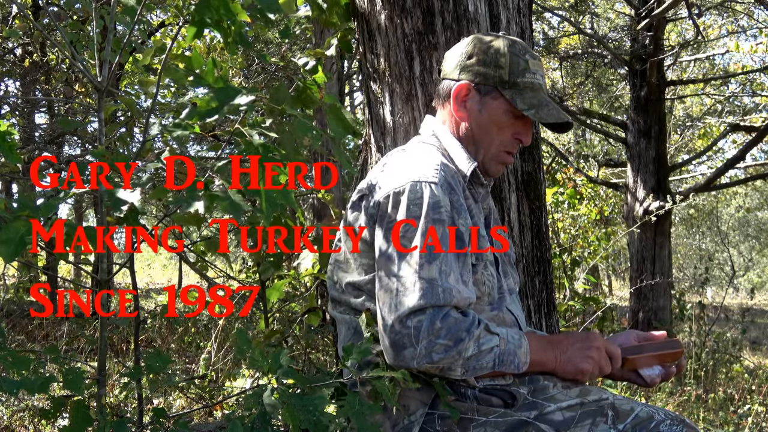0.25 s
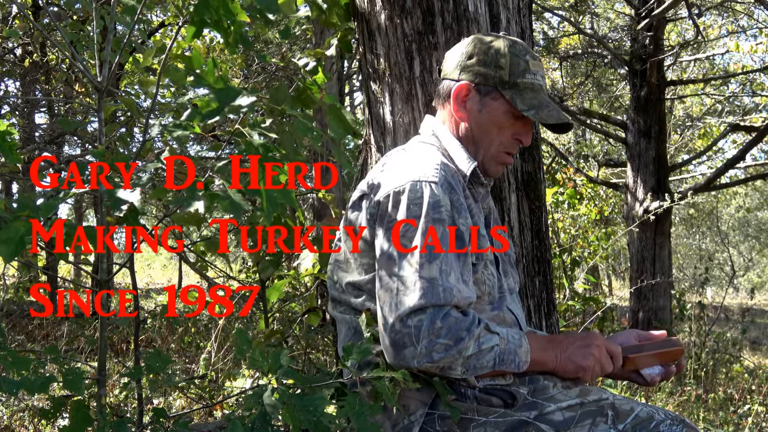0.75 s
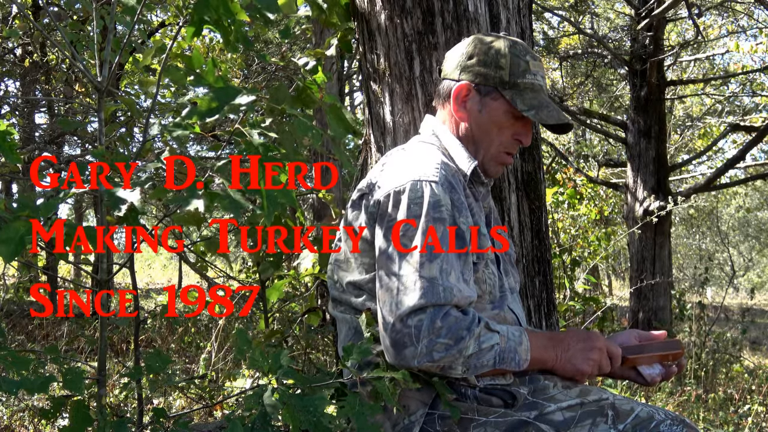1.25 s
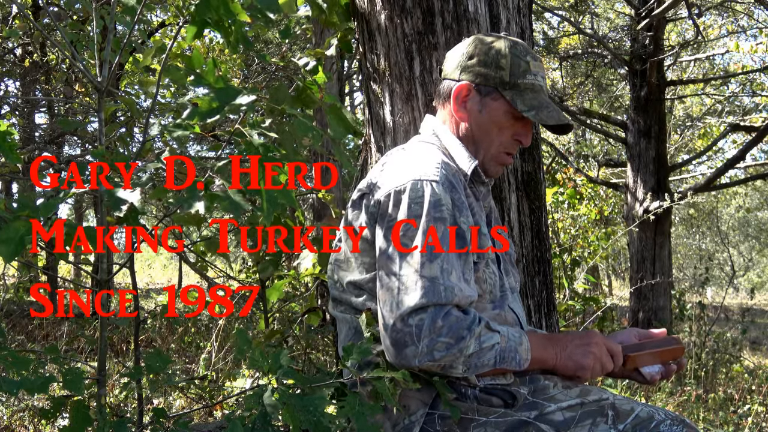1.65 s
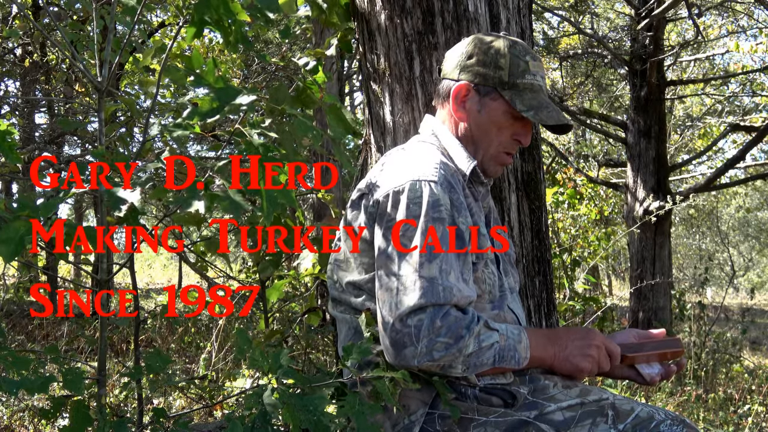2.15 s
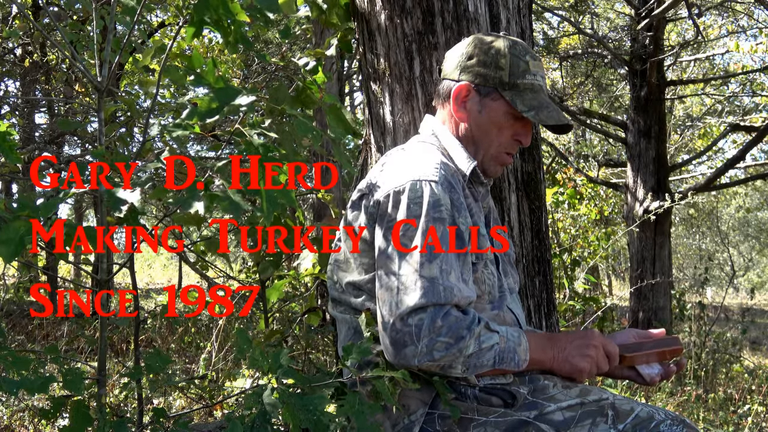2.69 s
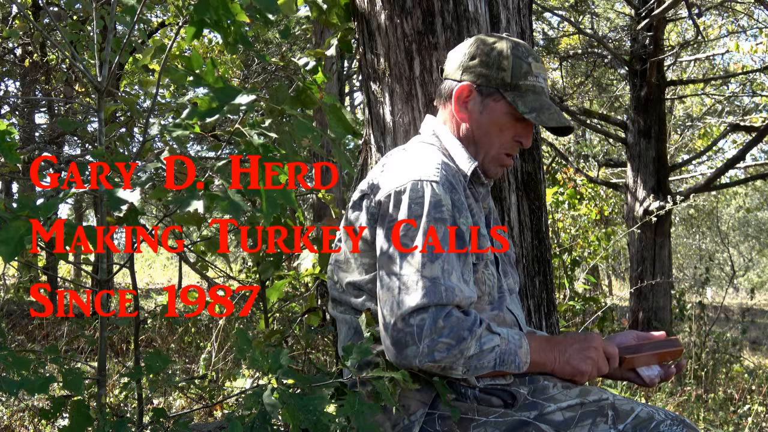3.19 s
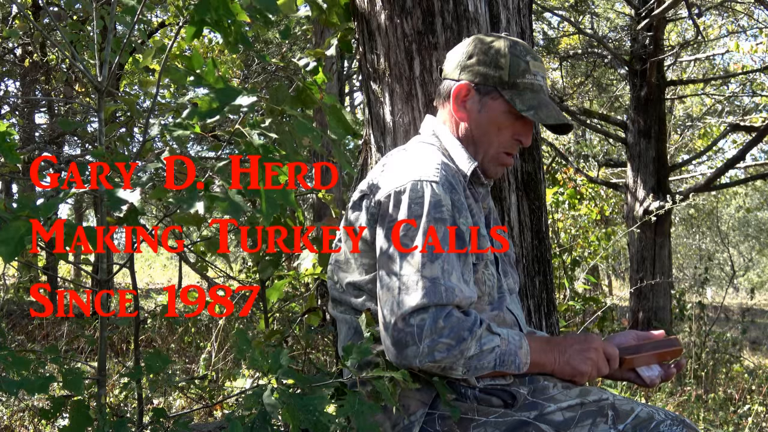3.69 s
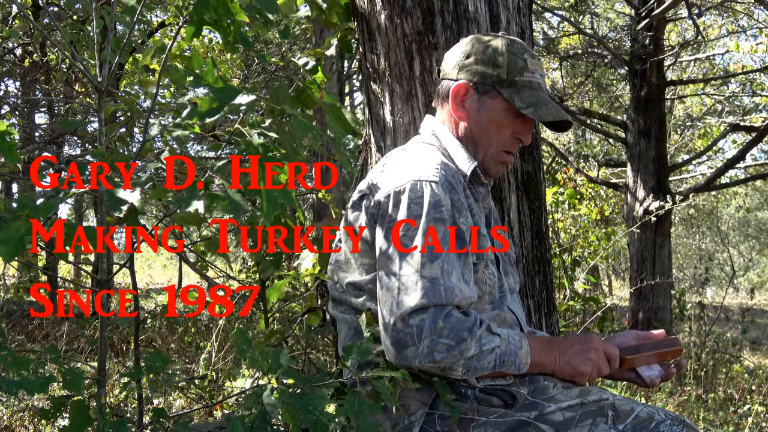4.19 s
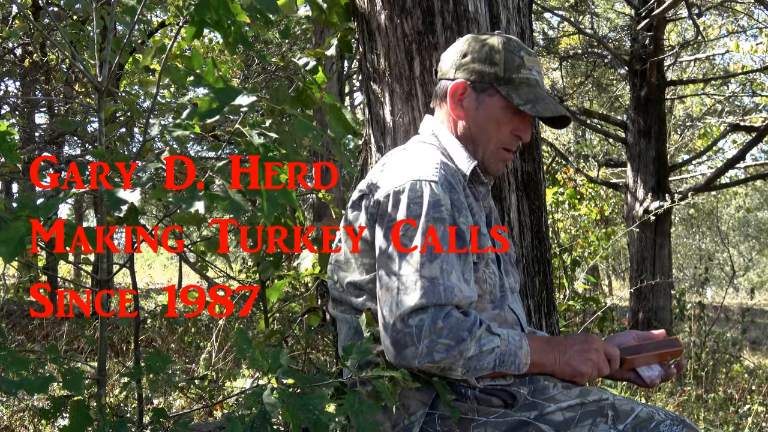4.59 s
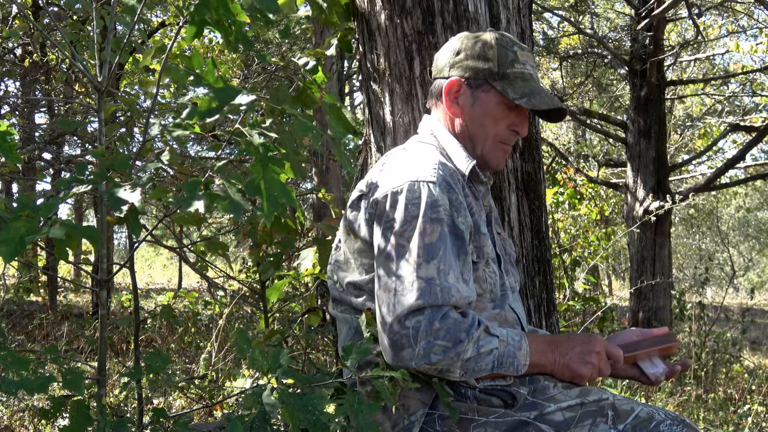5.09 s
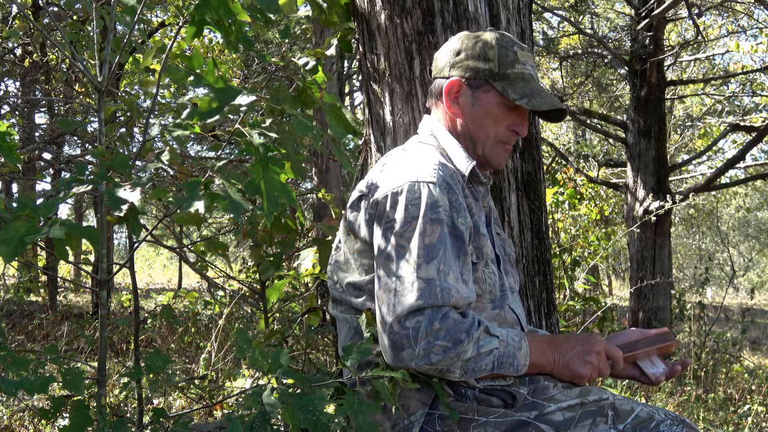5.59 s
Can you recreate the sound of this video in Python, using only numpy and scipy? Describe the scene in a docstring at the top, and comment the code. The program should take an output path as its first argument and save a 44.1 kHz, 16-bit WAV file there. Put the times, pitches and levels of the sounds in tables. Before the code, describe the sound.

Seven squeaky, rasping hen-turkey yelps scraped on a wooden box, a lone cluck, then hushed woodland with crickets and a faint far bird.

```python
"""A katydid's even run of ticks opens the scene over chirping crickets, faint rustle and insect chorus.
Then a wooden box call gives seven turkey yelps and one sharp cluck: its chalked lid sticks and slips on the
rim, squeaks thinly, locks onto the side wall's resonance and breaks into a rasp as a lower vibration joins in.
Ground and trees return echoes as delayed copies and a noise tail. Later the katydid buzzes as modulated noise,
and a far bird cries in wavering harmonics, with two soft pips and two dull thuds of shaped tone and noise."""
import sys
import numpy as np
from scipy import signal
from scipy.fft import rfft, irfft, next_fast_len
from scipy.io import wavfile
from scipy.ndimage import uniform_filter1d, minimum_filter1d, map_coordinates

SR = 44100
rng = np.random.default_rng(int(sys.argv[2]) if len(sys.argv) > 2 else 0)


def unload_audio(sound):
    """Save the sound as a 16-bit wav file, at the path given as the first command line argument."""
    columns = np.transpose(np.atleast_2d(sound))
    # keep every value between -1 and 1, then stretch to whole-number steps
    steps = np.round(np.clip(columns, -1, 1) * 32767)
    wavfile.write(sys.argv[1], SR, steps.astype(np.int16))


N = 257981
TIME = np.arange(N) / SR  # seconds

# Strokes of the lid. Each row: start, lock, break and end in seconds, free pitch in Hz, locked pitch in Hz,
# relative level in dB, roughness of the rasp from 0 to 1.
STROKES = [ (0.65, .662, .709, .730, 813, 799.3, -4, .5),
           (0.978, 0.996, 1.046, 1.08, 963.6, 832.8, 0.5, .7),
           (1.308, 1.332, 1.380, 1.41, 947, 840.5, 0.5, .7),
           (1.594, 1.629, 1.660, 1.696, 1017, 855.5, 0.5, .98),
           (1.875, 1.916, 1.946, 1.987, 997, 843.3, 0, .9),
           (2.172, 2.216, 2.240, 2.284, 1028, 846.5, 0, .98),
           (2.474, 2.502, 2.537, 2.5725, 1011, 846.8, 0.5, .98)]
# The lid catches on the rim. Each row: time in seconds, relative level in dB.
CATCHES = [(.968, -36), (1.309, -12.5), (1.593, -15.5), (2.166, -30.5), (2.470, -18)]
# Broad response of the hollow box. Each row: frequency in Hz, gain in dB.
BOX_RESPONSE = [(100, -41), (550, -47), (800, -32), (1050, -8), (1600, -7), (2150, -23), (3450, -30.5),
                (4400, -31.5), (6500, -28), (9500, -36.5), (13000, -39.5), (15500, -53)]
# Resonances of its thin walls. Each row: centre in Hz, width at half the lift in Hz, lift in dB.
WALL_RESONANCES = [(1660, 280, 6.5), (2530, 180, 5.5), (2837, 340, 11), (3137, 180, 10), (3980, 270, 16.5),
                   (5050, 230, 3.5), (5630, 350, 7), (8030, 380, 12), (10926, 300, 13)]
# Dull rub of lid on rim. Each row: frequency in Hz, relative level in dB.
RUB_COLOUR = [(40, -8.5), (160, -4), (450, -8), (900, -15.5), (2000, -41)]
# Dry scrape and rattle of the cluck. Each row: frequency in Hz, relative level in dB.
CHATTER_COLOUR = [(450, -37), (750, -5.5), (1200, -6.5), (2300, 5), (3400, -9.5), (5700, -6.5),
                  (8000, -9.5), (15000, -31)]
# Distinct echoes of ground and trees. Each row: delay in seconds, level in dB.
TRUNK_ECHOES = [(.011, -27), (.024, -29), (.113, -35), (.138, -43)]
# Colour of the sound sent back by the woods. Each row: frequency in Hz, relative level in dB.
ECHO_COLOUR = [(300, 0.5), (1200, -11), (1750, -5.5), (2300, 1), (3400, 4.5), (4000, 3.5), (4700, 12.5),
               (8000, 4.5), (15000, -3)]
# Decay of the woods. Each row: frequency in Hz, time to fall by 60 dB in seconds.
WOODS_T60 = [(300, 0.26), (1150, .48), (1700, 0.85), (2500, .54), (4000, 0.42), (12000, .27)]
# Response of one katydid tick. Each row: frequency in Hz, gain in dB.
TICK_COLOUR = [(1200, -63), (2500, -4.5), (4500, 0.5), (7500, 1), (10000, -19), (15000, -26)]
# Colour of the katydid's buzz. Each row: frequency in Hz, relative level in dB.
BUZZ_COLOUR = [(5500, -36.5), (8000, -14), (9600, -6), (11500, -15), (15000, -22.5)]
# Crickets. Each row: note in Hz, chirp period in seconds, time of one chirp in seconds, rms level in dB.
CRICKETS = [(6220, .159, 3.785, -68), (7060, .166, 3.735, -64), (7700, .1165, 3.685, -67)]
# Far bird. Each row: start in seconds, length in seconds, initial fundamental in Hz, level of the fourth
# harmonic in dB, third harmonic against the fourth in dB.
CRIES = [(2.914, 0.33, 761, -63, -13), (3.675, 0.3, 777, -70.5, -3), (5.378, .2, 761, -68, 5.5),
         (5.558, 0.24, 745, -69.5, -2.5)]
# Faint short notes. Each row: time in seconds, pitch in Hz, level in dB.
PIPS = [(5.038, 1430, -51.5), (5.217, 1320, -46)]
# Soft low thuds. Each row: time in seconds, level in dB.
BUMPS = [(.99, -55.5), (4.27, -50.5)]
# Colour of the thuds. Each row: frequency in Hz, relative level in dB.
BUMP_COLOUR = [(15, -9.5), (40, 4), (90, -9), (200, -30.5), (800, -59)]
# Rustle and far rumble. Each row: frequency in Hz, relative level in dB.
AIR_COLOUR = [(12, -36), (20, -15.5), (65, 3), (99, -1), (131, -9), (328, -14), (477, -9.5), (1060, -10),
              (1170, -6), (1440, -18), (1620, -19.5), (2150, -20), (5500, -23), (7150, -55), (12100, -120)]
# Distant insects. Each row: frequency in Hz, relative level in dB.
CHORUS_COLOUR = [(4500, -38.5), (5600, -22), (6200, -3), (6700, -9), (7600, -8.5), (8400, -15.5),
                 (9300, -15.5), (12000, -18.5), (15500, -25)]

# Contact of lid and rim: its two edge times, and the level one such time outside full contact
ATTACK_S, RELEASE_S, EDGE_DB = .0055, .0095, -20
SQUEAK_DB, EASE_DB = -16.5, -6  # pressure at the start and end of a stroke, against the locked part
SNAP_POWER, SINK_S = 3.7, .049  # abruptness of the snap onto the wall's pitch; time of sinking halfway
LAST_HZ = 786.1  # the pitch towards which every stroke sinks
# The grip breaks this fast, rasps for this share of the time from break to end, then settles
BREAK_S, RASP_SHARE, SETTLE_S = .0085, .38, .014
LOCKED_ROUGH, RASP_ROUGH, SETTLED_ROUGH = .16, .98, .2  # factors on each stroke's own roughness
LOWER_HZ, LOWER_END_HZ, SLIDE_S = 1403, 1083, .005  # downward slide of the lower vibration
# Its peak after the break, and its growth and decay
LOWER_PEAK_S, LOWER_RISE_DB_PER_S, LOWER_FALL_DB_PER_S = .0075, 1250.5, 330
CLUCK_S, CLUCK_DB, CLUCK_HZ = 3.4205, -1.5, 1150  # start of full pressure, relative level, first pitch
CLUCK_ATTACK_S, CLUCK_HOLD_S, CLUCK_RELEASE_S = .004, .0078, .0039  # the pitch falls during the hold
CHATTER_DB, CHATTER_T60_S = -27.5, .055  # the lid rattles to rest after the flick
TICK_START_S, TICK_PERIOD_S = .0148, .04475
TICK_START_DB, TICK_SWELL_DB, TICK_SWELL_S = -30, 8, .31  # crescendo of the ticks
BUZZ_FULL_S, BUZZ_STOP_S, BUZZ_DB = 2.7, 3.39, -56.5  # end of its attack, its stop, its level at the stop
BUZZ_ATTACK_S, BUZZ_RELEASE_S, BUZZ_SWELL_DB_PER_S = .51, .06, 8
AIR_DB, INSECTS_DB = -61, -62  # rustle and insect chorus at the start
AIR_RISE_DB_PER_S, INSECTS_RISE_DB_PER_S = .46, .59
TOP_HZ = 15800  # upper band limit of the whole sound


def yelps(jitter=.082, coupling=.04, scatter=.54, grit_db=-7, rub_db=-53, softening=.05,
          snap_db=1.1, lift_db=.15, chalk_rough=.04, squawk_db=-5):
    """Stick-slip friction: the chalked lid drives the box, and late in a stroke a lower vibration fights it."""
    force, squawks, load = np.zeros((3, N))
    chance = np.array([wobble(900), wobble(700), wobble(260), wobble(330), wobble(90),
                       rng.standard_normal(N)])
    for start, lock, crack, end, free_hz, locked_hz, db, roughness in STROKES:
        span = (TIME > start - ATTACK_S) & (TIME < end + RELEASE_S)
        t = TIME[span]
        timing, strength, drift, flutter, tremor, grit = chance[:, span]
        squawk = crack + RASP_SHARE * (end - crack)  # here the rasp begins to settle
        hz = stroke_pitch(t, start, lock, crack, end, free_hz, locked_hz) * (1 + .0015 * tremor)
        cycles = np.cumsum(hz) / SR
        # the hand presses harder until the lock, holds, and eases off after the break
        locking = ramp(t, start, lock - start)
        effort_db = db + SQUEAK_DB * (1 - locking) + EASE_DB * ramp(t, crack, end - crack)
        effort_db += edges_db(t, start + ATTACK_S * 1.1, end - RELEASE_S, ATTACK_S, RELEASE_S)
        pressure = amp(effort_db)
        rough = chalk_rough + stroke_roughness(t, lock, crack, squawk, roughness)
        lower = lower_vibration(t, crack, squawk, .79 * drift) * amp(.82 * flutter)
        # light pressure rounds the slips off, and so does the snap from one pitch to the other
        dull_db = snap_db * np.sin(np.pi * locking ** SNAP_POWER) - softening * effort_db
        dull_db += lift_db * ramp(t, squawk + SETTLE_S / 2, end - squawk)
        pulses = slips(cycles + jitter * rough * timing + coupling * lower, dull_db=dull_db)
        uneven_pulses = pulses * (1 + scatter * rough * strength)
        force[span] += pressure * (uneven_pulses + amp(grit_db) * rough * grit)
        squawks[span] += pressure * lower
        load[span] += pressure * roughness
    rub = amp(rub_db + 1.8 * wobble(60)) * load * coloured(rng.standard_normal(N), RUB_COLOUR)
    return amp(-4.5) * box(force) + amp(squawk_db) * squawks + rub


def stroke_pitch(t, start, lock, crack, end, free_hz, locked_hz, slack_power=2.5):
    """Frequency locking: the squeak sags onto the wall's resonance, holds, and sinks as the grip fails."""
    squeak = 1 - ramp(t, start, lock - start) ** SNAP_POWER
    grip = .5 ** (np.maximum(t - lock, 0) / SINK_S) ** 3
    grip *= .5 + .5 * (1 - ramp(t, crack, end - crack)) ** slack_power
    return LAST_HZ + (locked_hz - LAST_HZ) * grip + (free_hz - locked_hz) * squeak


def stroke_roughness(t, lock, crack, squawk, roughness):
    """Loss of periodicity: slips grow uneven while locked, turn chaotic at the break and then settle."""
    locked = LOCKED_ROUGH * roughness * ramp(t, lock - BREAK_S / 2, crack - lock)
    rasp = RASP_ROUGH * ramp(t, crack - BREAK_S / 2, BREAK_S)
    rasp -= (RASP_ROUGH - SETTLED_ROUGH) * ramp(t, squawk, SETTLE_S)
    return roughness * (locked + rasp)


def lower_vibration(t, crack, squawk, drift):
    """A competing mode grows exponentially at the break, then decays while its frequency slides down."""
    hz = LOWER_END_HZ + (LOWER_HZ - LOWER_END_HZ) / (1 + np.exp((t - squawk) / SLIDE_S))
    age = t - crack - LOWER_PEAK_S
    swell_db = np.minimum(LOWER_RISE_DB_PER_S * age, -LOWER_FALL_DB_PER_S * age)
    return amp(swell_db) * np.sin(2 * np.pi * np.cumsum(hz) / SR + drift)


def slips(cycles, dull_db=0, count=19):
    """Harmonic series of one slip per cycle; each harmonic above the second loses a further dull_db."""
    return sum(amp(-dull_db * max(k - 2, 0)) * np.cos(2 * np.pi * k * cycles) for k in range(1, count + 1))


def cluck(jitter=.02, grit=.82, scrape_db=-24, knock_hz=1190, knock_db=-7.0, bite_db=.04):
    """Impulsive stick-slip: a flick knocks the lower vibration, sweeps down in pitch, and the lid chatters."""
    lift = CLUCK_S + CLUCK_HOLD_S
    hz = CLUCK_HZ + (LAST_HZ - CLUCK_HZ) * ramp(TIME, CLUCK_S, CLUCK_HOLD_S)
    cycles = np.cumsum(hz) / SR + jitter * wobble(900)
    pressure = amp(CLUCK_DB + edges_db(TIME, CLUCK_S, lift, CLUCK_ATTACK_S, CLUCK_RELEASE_S))
    pressure *= (TIME > CLUCK_S - 2 * CLUCK_ATTACK_S) & (TIME < lift + 2 * CLUCK_RELEASE_S)
    swell = np.exp(-((TIME - CLUCK_S - .0008) / .002) ** 2)
    knock = amp(knock_db) * swell * np.sin(2 * np.pi * knock_hz * TIME)
    rattle_db = CHATTER_DB - 60 * np.maximum(TIME - lift, 0) / CHATTER_T60_S
    chatter = ramp(TIME, CLUCK_S, CLUCK_HOLD_S) * amp(rattle_db)
    grip = ramp(TIME, CLUCK_S - CLUCK_ATTACK_S / 2, CLUCK_HOLD_S / 2 + CLUCK_ATTACK_S / 2)
    friction = slips(cycles, dull_db=-bite_db, count=13) + grit * rng.standard_normal(N)
    squeal = box(pressure * grip * friction)
    dry_noise = coloured(rng.standard_normal(N), CHATTER_COLOUR)
    return knock + amp(-5.0) * squeal + (amp(scrape_db) * pressure + chatter) * dry_noise


def catches(knock_hz=1270, scrape_db=3):
    """Impact excitation: the landing lid scrapes for a moment and knocks the lower vibration into life."""
    blows = np.zeros(N)
    for s, db in CATCHES:
        age = np.maximum(TIME - s + .0005, 0) / .002  # in units of the 2 ms rise time
        blows += amp(db) * age * np.exp(1 - age)
    knock = .35 * np.sin(2 * np.pi * knock_hz * TIME + .5 * wobble(210))
    return blows * knock + box(amp(scrape_db) * blows * rng.standard_normal(N))


def box(force, size=4096):
    """Resonator: the hollow box rings after each push, with the minimum-phase response of its colour."""
    hz = np.fft.rfftfreq(size, 1 / SR)
    db = along(BOX_RESPONSE, hz)
    for centre, width, lift in WALL_RESONANCES:
        db = db + lift * .5 ** ((2 * (hz - centre) / width) ** 2)
    # folding the cepstrum onto positive times makes the response causal and minimum phase
    cepstrum = irfft(np.log(amp(db)))
    cepstrum[1:size // 2] *= 2
    cepstrum[size // 2 + 1:] = 0
    impulse_response = irfft(np.exp(rfft(cepstrum)))
    return signal.fftconvolve(force, impulse_response)[:N]


def woods(x, lumpy_db=3):
    """Diffuse scattering: a lumpy train of echoes rings longest near 1.7 kHz and dies sooner below and above."""
    hz, t, z = signal.stft(rng.standard_normal((2, SR)), SR, nperseg=256)
    trunks_db = lumpy_db * rng.standard_normal(len(t))
    decay_db = -60 * t / along(WOODS_T60, hz)[:, None]
    z = z * amp(along(ECHO_COLOUR, hz)[:, None] + trunks_db + decay_db)
    tail = unit(signal.istft(z, SR, nperseg=256)[1]) / np.sqrt(SR)
    return spread(signal.fftconvolve(x[None], tail, axes=1)[:, :N], side_db=-14)


def katydid(count=14, uneven_db=2, wing_hz=85):
    """Stridulation: wing strikes give a run of ticks in crescendo, and later a modulated, swelling buzz."""
    times = TICK_START_S + TICK_PERIOD_S * np.arange(count)
    strikes_db = TICK_START_DB + TICK_SWELL_DB * ramp(times, TICK_START_S, TICK_SWELL_S)
    strikes = np.zeros(N)
    strikes[np.round(times * SR).astype(int)] = amp(strikes_db + uneven_db * rng.standard_normal(count))
    ticks = filtered(strikes, lambda hz: amp(along(TICK_COLOUR, hz)))
    wings = 1 + .447 * np.sin(2 * np.pi * wing_hz * TIME + .5 * wobble(8))
    gate = ramp(TIME, BUZZ_FULL_S - BUZZ_ATTACK_S, BUZZ_ATTACK_S)
    gate *= 1 - ramp(TIME, BUZZ_STOP_S, BUZZ_RELEASE_S)
    level = amp(BUZZ_DB + BUZZ_SWELL_DB_PER_S * (TIME - BUZZ_STOP_S))
    return ticks + gate * level * wings * hiss(BUZZ_COLOUR, side_db=-5)


def crickets():
    """Amplitude modulation: periodic pulses shape a nearly pure tone, each cricket with its note and tempo."""
    song = np.zeros(N)
    for hz, period, s, db in CRICKETS:
        chirps = np.maximum(np.cos(2 * np.pi * (TIME - s) / period + .47 * wobble(1.4)), 0) ** 2
        song += amp(db) * unit(chirps * np.sin(2 * np.pi * hz * TIME + .5 * wobble(150)))
    return song * amp(np.interp(TIME, [3.2, 3.7], [-7, 0]))  # the crickets grow louder between these times


def birds():
    """Harmonic synthesis: wavering, falling cries of harmonics two to four, and two soft tone pips."""
    song = np.zeros(N)
    for s, length, hz, db, third_db in CRIES:
        u = np.clip((TIME - s) / length, 0, 1)
        phase = 2 * np.pi * np.cumsum(hz * (1 - .07 * u + .005 * wobble(80))) / SR
        voice = .4 * np.sin(2 * phase) + amp(third_db) * np.sin(3 * phase) + np.sin(4 * phase)
        song += amp(db + 2.5 * wobble(25)) * np.sin(np.pi * u) * voice
    for s, hz, db in PIPS:
        swell = np.exp(-((TIME - s) / .0076) ** 2)
        song += amp(db) * swell * np.sin(2 * np.pi * hz * TIME + wobble(200))
    return song


def bumps(width=.025):
    """Noise bursts: a bell-shaped swell of low noise is heard as a dull thud."""
    swell = sum(amp(db) * np.exp(-((TIME - s) / width) ** 2) for s, db in BUMPS)
    return swell * coloured(rng.standard_normal(N), BUMP_COLOUR)


def background():
    """Stationary noise: a low rustle of the woods under a band of distant insects, both slowly rising."""
    air_db = AIR_DB + AIR_RISE_DB_PER_S * TIME + .47 * wobble(4.9)
    insects_db = INSECTS_DB + INSECTS_RISE_DB_PER_S * TIME + .5 * wobble(12)
    air = amp(air_db) * hiss(AIR_COLOUR, side_db=-11.5)
    return air + amp(insects_db) * hiss(CHORUS_COLOUR, side_db=-3)


def ramp(t, begin, length):
    """Linear onset: rise from 0 to 1 over the given length of time."""
    return np.clip((t - begin) / length, 0, 1)


def edges_db(t, on, off, attack, release):
    """Contact envelope: full from on to off, with a quadratic fall in dB outside, limited at two edge times."""
    outside = np.maximum((on - t) / attack, (t - off) / release)
    return EDGE_DB * np.clip(outside, 0, 2) ** 2


def amp(db):
    """Logarithmic level: decibels to amplitude gain."""
    return 10 ** (np.asarray(db) / 20)


def unit(x):
    """Normalisation: scale to rms 1."""
    return x / np.sqrt(np.mean(x ** 2) + 1e-20)


def along(points, hz):
    """Interpolation of (Hz, value) points on a logarithmic frequency axis."""
    f, v = np.transpose(points)
    return np.interp(np.log(hz + 1), np.log(f + 1), v)


def wobble(rate):
    """Slow random modulation: a smooth curve through random knots, rate of them a second."""
    return map_coordinates(rng.standard_normal(int(N * rate / SR) + 4), [TIME * rate])


def filtered(x, response):
    """Linear filtering: multiply the spectrum by a gain that depends on frequency."""
    size = next_fast_len(N + SR // 2)
    return irfft(rfft(x, size) * response(np.fft.rfftfreq(size, 1 / SR)), size)[..., :N]


def coloured(x, spectrum):
    """Spectral shaping: filter x by (Hz, dB) points and bring it to rms 1."""
    return unit(filtered(x, lambda hz: amp(along(spectrum, hz))))


def spread(pair, side_db):
    """Mid-side stereo: left and right as sum and difference of a middle and a weaker side signal."""
    mid, side = pair[0], pair[1] * amp(side_db)
    return np.array([mid + side, mid - side])


def hiss(spectrum, side_db):
    """Partly correlated stereo noise of the given colour."""
    return spread(coloured(rng.standard_normal((2, N)), spectrum), side_db)


def scene():
    """Superposition: the call just right of centre, its echoes, then the animals and the background."""
    call = yelps() + cluck() + catches()
    echoes = amp(-17.0) * woods(call)
    for delay, db in TRUNK_ECHOES:
        echoes = echoes + amp(db) * np.pad(call, (round(delay * SR), 0))[:N]
    panned_call = call * amp([[-.4], [.4]])
    return panned_call + echoes + katydid() + crickets() + birds() + bumps() + background()


def record(dry, ceiling=.7, size=90):
    """Peak limiting: a fast common gain, smoothed over size samples, holds the peaks; then a band limit."""
    needed = ceiling / np.maximum(abs(dry).max(axis=0), ceiling)
    gain = uniform_filter1d(minimum_filter1d(needed, size), size)
    return filtered(dry * gain, lambda hz: hz < TOP_HZ)


dry = scene()
out = record(dry)
unload_audio(out)
```